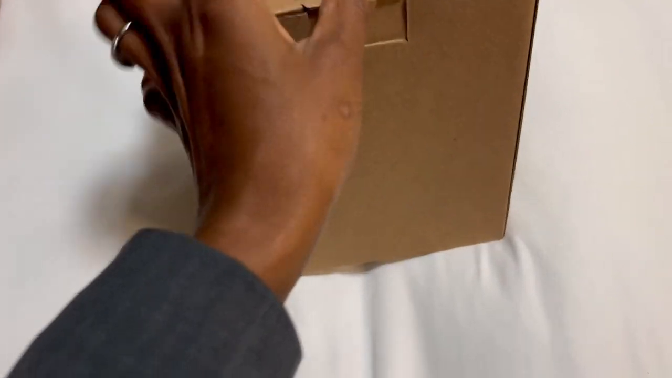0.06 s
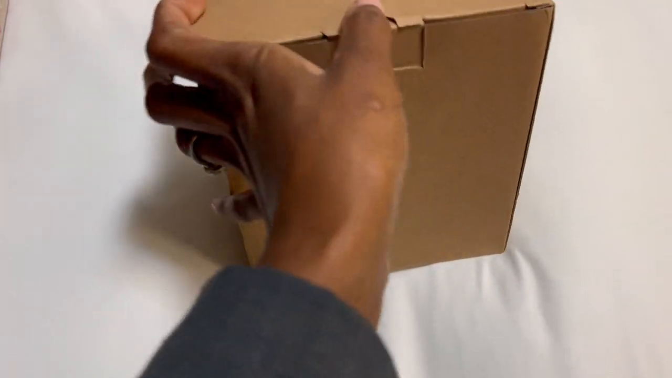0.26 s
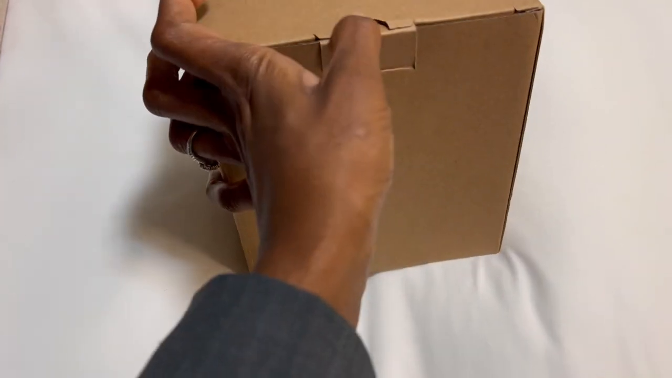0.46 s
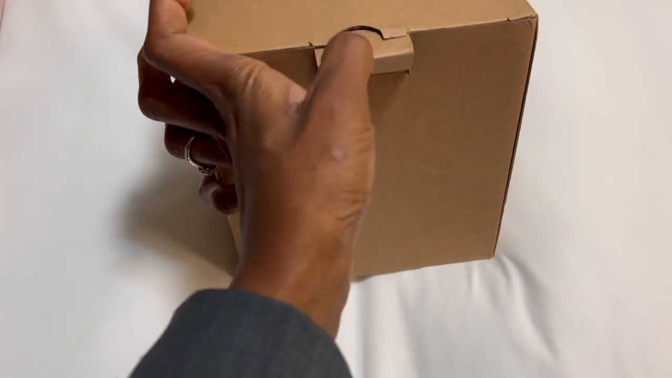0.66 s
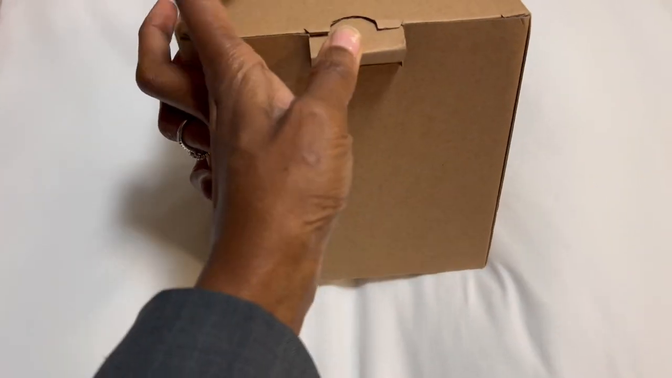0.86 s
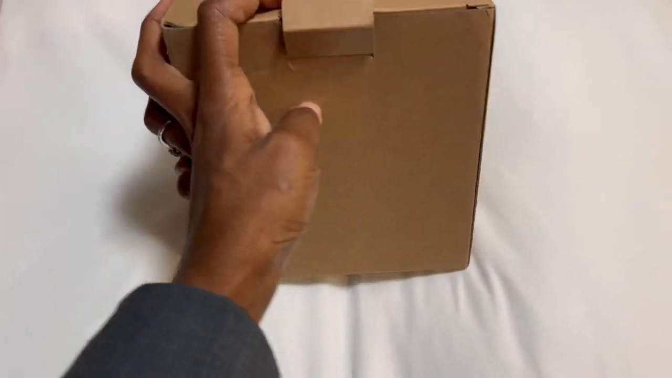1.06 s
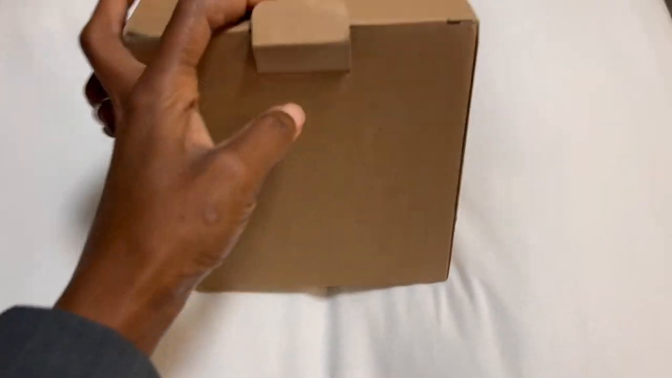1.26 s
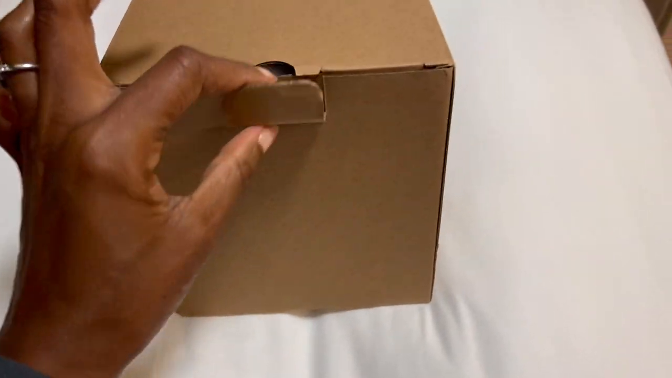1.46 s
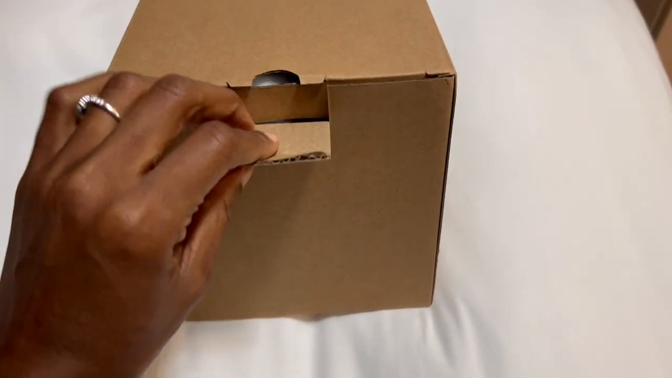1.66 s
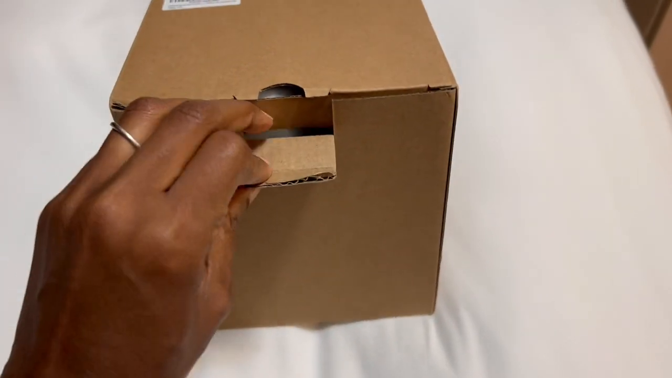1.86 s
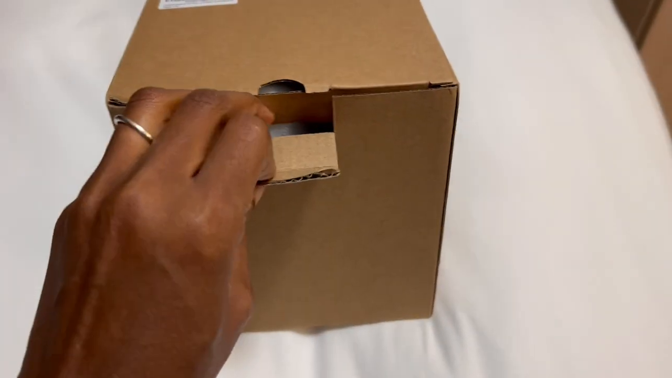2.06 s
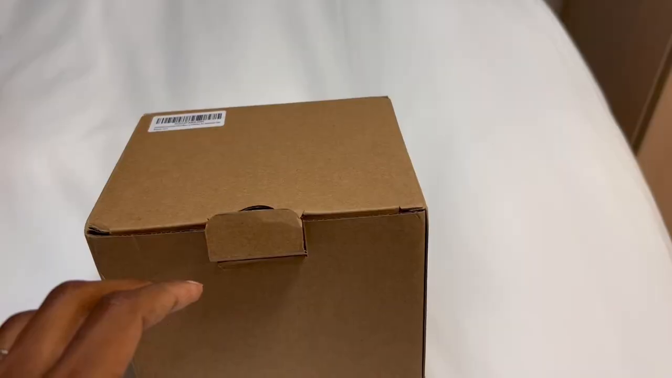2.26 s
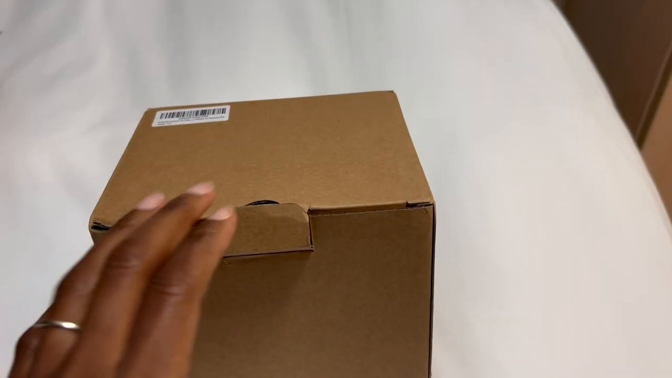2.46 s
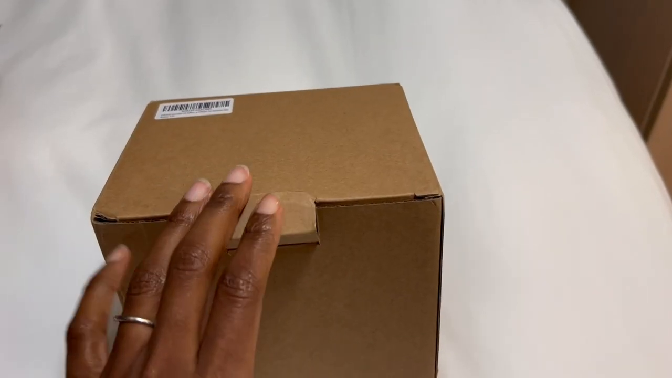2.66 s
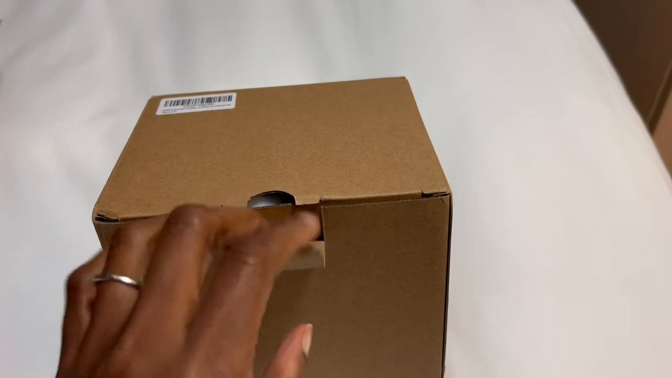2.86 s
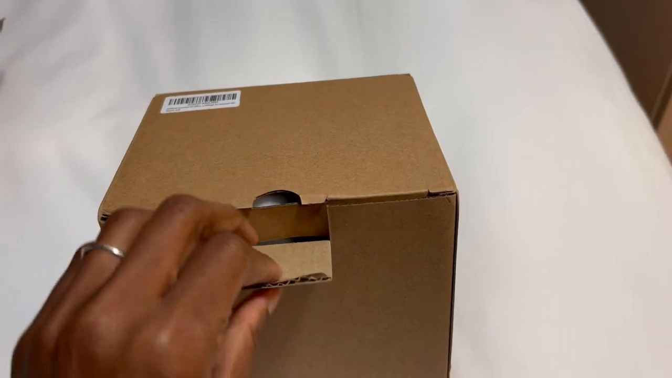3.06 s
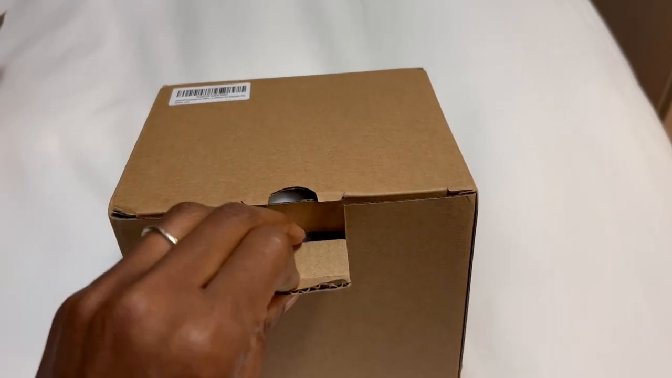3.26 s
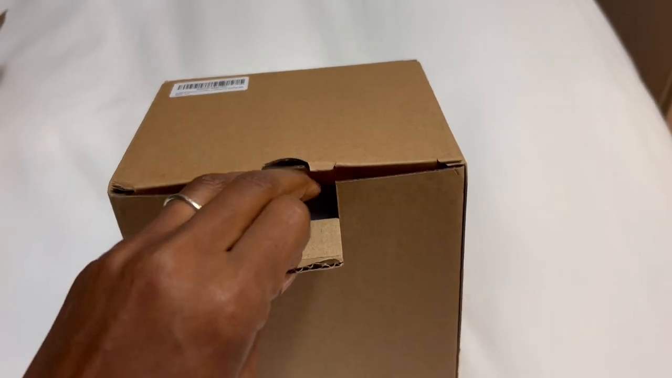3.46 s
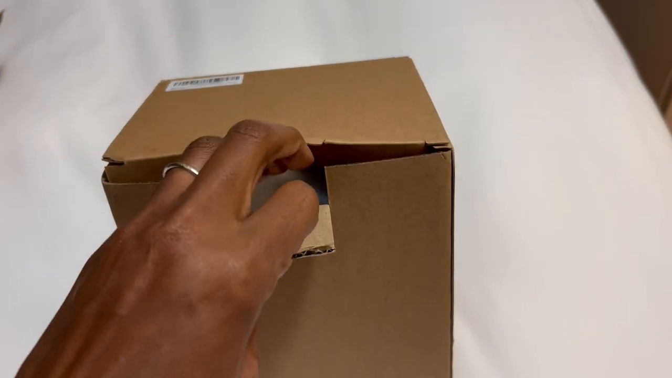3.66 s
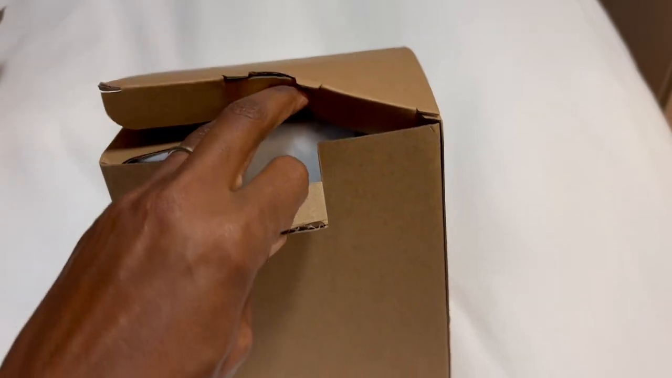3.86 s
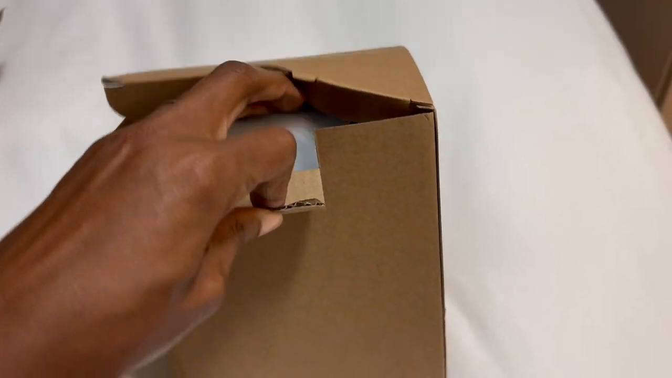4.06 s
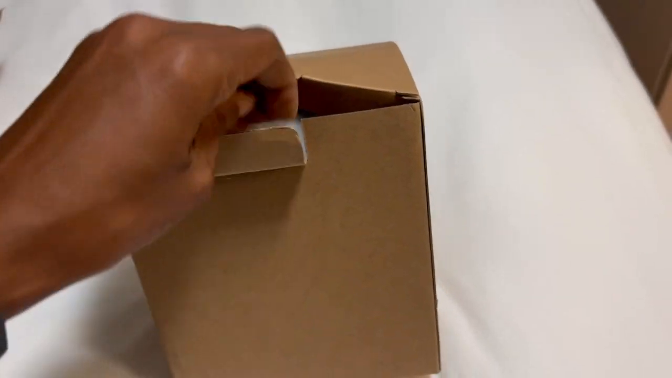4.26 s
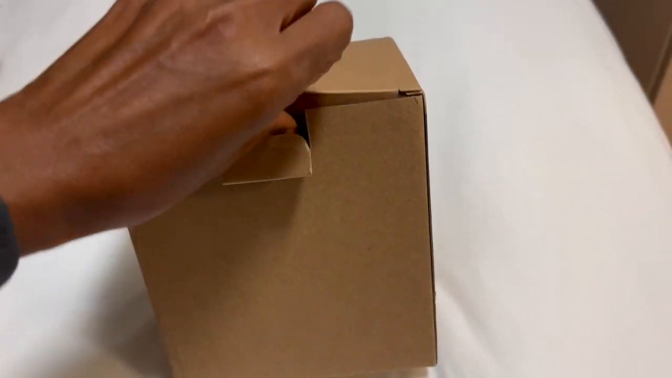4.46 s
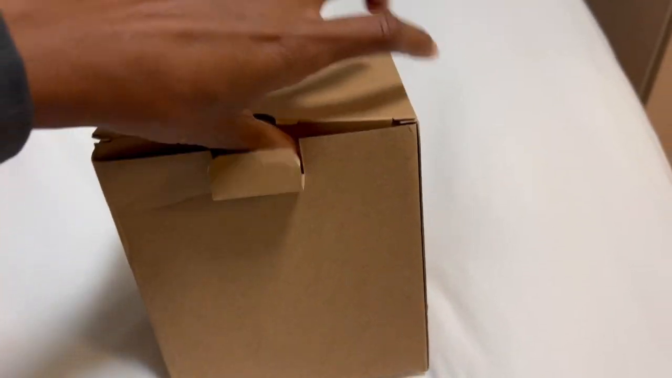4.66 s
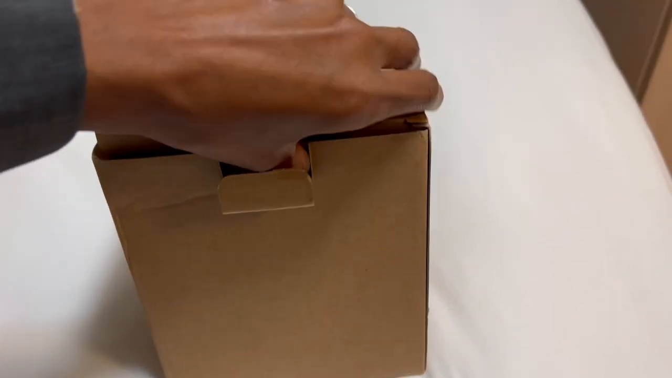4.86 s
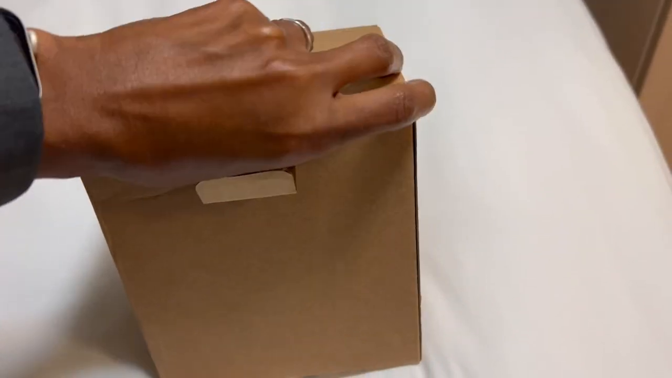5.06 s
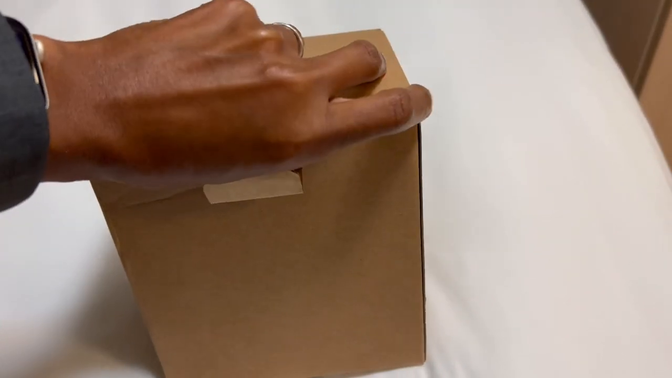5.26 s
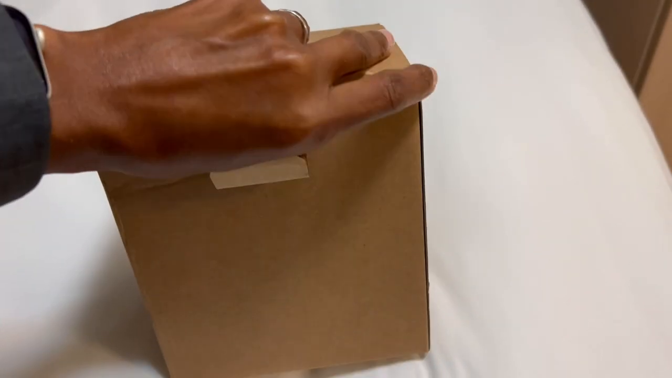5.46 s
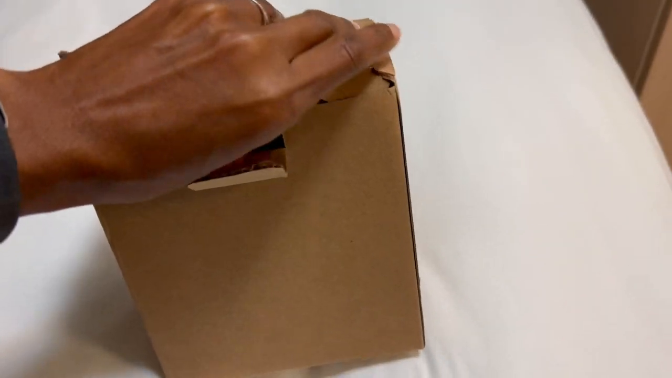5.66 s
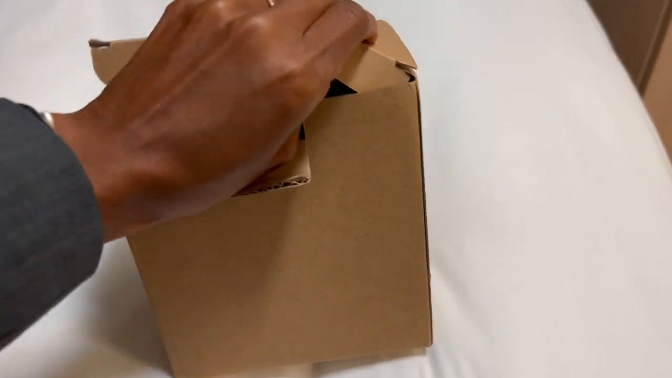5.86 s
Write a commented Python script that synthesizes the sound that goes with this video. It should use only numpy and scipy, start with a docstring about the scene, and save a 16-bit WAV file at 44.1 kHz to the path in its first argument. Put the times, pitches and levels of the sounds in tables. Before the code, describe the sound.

Thin cardboard is handled on soft bedding, heard very close in stereo, slightly left, with a short room answer. Dry rubbing and tiny ticks come first, then a strong scraping pop as a tab pulls out. The middle is subdued, with faint taps. From about 3.5 seconds the flap grates and clicks, a sharp knock sounds near 4.4 seconds, and another hard one follows a second later over continuing rustle.

```python
"""Fingertips rub and hiss over thin card, with a soft knock at once, close up in a quiet bedroom.
A hand is opening a small corrugated cardboard box on a bed: the tab scrapes out, the lid is prised up.
Rubs and scrapes are random fibre slips coloured by panel modes; ticks are short bursts on a ringing edge.
Each knock sends a bending wave through the panels, a quick falling chirp ending in a hollow thump.
Low room rumble and a short room answer surround the box, spread over two microphone ports."""
import sys
import numpy as np
from scipy import signal
from scipy.fft import rfft, irfft, next_fast_len
from scipy.io import wavfile
from scipy.ndimage import uniform_filter1d, map_coordinates

SR = 44100
rng = np.random.default_rng(int(sys.argv[2]) if len(sys.argv) > 2 else 0)


def bounce(signal):
    """Save signal as a 16-bit WAV file at the path given by the first command-line argument."""
    frames = np.transpose(np.atleast_2d(signal))
    limited = np.clip(frames, -1, 1)
    pcm = np.round(limited * 32767).astype(np.int16)
    wavfile.write(sys.argv[1], SR, pcm)


N = 261053
TIME = np.arange(N) / SR  # s
TOP_HZ = 16100  # upper band limit of the finished sound


def amp(db):
    """Decibels to gain."""
    return 10 ** (np.asarray(db) / 20)


def unit(x):
    """Scale to rms 1."""
    return x / np.sqrt(np.mean(x ** 2) + 1e-20)


def crest(x, size=441):
    """Scale so that the loudest 10 ms have rms 1."""
    loudest = uniform_filter1d(x ** 2, size).max()
    return x / np.sqrt(loudest + 1e-20)


def along(points, hz):
    """Interpolate (Hz, value) points on a log frequency axis."""
    f, v = np.transpose(points)
    return np.interp(np.log(hz + 1), np.log(f + 1), v)


def filtered(x, response):
    """Filter x by a complex response of frequency, with zero padding for its tail."""
    n = x.shape[-1]
    m = next_fast_len(n + SR // 8)
    hz = np.fft.rfftfreq(m, 1 / SR) + 1e-3  # keeps clear of 0 Hz
    return irfft(rfft(x, m) * response(hz), m)[..., :n]


def band(hz, lo_hz, hi_hz, order=6):
    """Gain of a band with soft edges."""
    return ((1 + (lo_hz / hz) ** order) * (1 + (hz / hi_hz) ** order)) ** -.5


def resonance(hz, centre, width):
    """Complex response of one damped mode, gain 1 at its centre."""
    return 1j * hz * width / (centre ** 2 - hz ** 2 + 1j * hz * width)


def add(track, s, sound):
    """Mix a sound into a track at time s, trimmed to fit."""
    start = round(s * SR)
    part = sound[max(-start, 0):len(track) - start]
    track[max(start, 0):][:len(part)] += part


def wobble(rate):
    """A smooth random curve, rate knots a second."""
    knots = rng.standard_normal(int(N * rate / SR) + 4)
    return map_coordinates(knots, [np.arange(N) * rate / SR], order=2)


def swell(start, length, top, shape):
    """A movement speeds up until the share top of its length, then slows; a larger shape is more pointed."""
    phase = np.interp((TIME - start) / length, [0, np.clip(top, .1, .9), 1], [0, .5, 1])
    moving = (phase > 0) & (phase < 1)
    speed = np.zeros(N)
    speed[moving] = np.sin(np.pi * phase[moving]) ** shape
    return speed


# Tone of the quiet room. Each row: frequency in Hz, relative level in dB.
AIR_TONE = [(20, -22), (60, 1.5), (90, -14), (140, -14), (450, -39.5), (6000, -52), (16000, -73.5)]


def air(level_db=-59):
    """Low room rumble, mostly alike at both ports, under a faint hiss that differs between them."""
    mid, side = filtered(rng.standard_normal((2, N)), lambda hz: amp(along(AIR_TONE, hz)))
    side = filtered(side, lambda hz: amp(along([(70, -8.5), (500, -1.0)], hz)))
    return amp(level_db) * unit(np.array([mid + side, mid - side]))


# How long the room rings. Each row: frequency in Hz, time to fall 60 dB in seconds.
ROOM_DECAY = [(150, 0.19), (14000, 0.26)]
# How strongly the room answers. Each row: frequency in Hz, relative level in dB.
ROOM_LEVEL = [(280, -12.5), (650, -12), (2500, -8), (12000, -12)]


def room(x):
    """Walls and bedding give a short answer: a decaying noise tail, different at each port."""
    hz, t, z = signal.stft(rng.standard_normal((2, SR // 3)), SR, nperseg=256)
    t60 = along(ROOM_DECAY, hz)[:, None]
    decay = amp(along(ROOM_LEVEL, hz)[:, None] - 60 * t / t60)
    z = z * decay * np.sqrt(2 * np.log(1000) / (t60 * SR))  # evens out the energy of long and short decays
    tail = signal.istft(z, SR, nperseg=256)[1]
    tail = np.pad(tail, ((0, 0), (SR // 300, 0)))  # the answer starts late
    return signal.fftconvolve(x[None], tail, axes=1)[:, :N]


# Phase by which the left port leads the right. Each row: frequency in Hz, phase in radians.
PORT_PHASE = [(220, .15), (1400, .7), (1800, -1.8), (2900, 1.5), (4300, -.1), (8100, .6), (10200, -3.1),
              (11600, -5.8), (12600, -6.8), (15000, -12.3)]
# Level of the left port over the right. Each row: frequency in Hz, difference in dB.
PORT_LEVEL = [(220, 0), (1000, 5.5), (4000, 5.5), (8000, 0)]


def ports(x):
    """The two ports hear the box with a level and phase difference that changes with frequency."""
    side = np.array([[.5], [-.5]])  # half of each difference per port

    def port(hz):
        return amp(side * along(PORT_LEVEL, hz)) * np.exp(1j * side * along(PORT_PHASE, hz))

    return filtered(x, port)


def width(x, side_db=-8, lo_hz=450, hi_hz=7000, size=8192):
    """The walls radiate from different places: a blend opposed at the ports, ever redrawn and crossfaded."""
    side = np.zeros(N)
    for start in range(0, N, size // 2):
        piece = x[start:start + size]
        piece = piece * np.hanning(size)[:len(piece)]
        paths = crush(np.arange(SR // 50) / SR, rise=0.00042, t60=0.0097)
        add(side, start / SR, signal.fftconvolve(piece, paths / np.linalg.norm(paths)))
    side = filtered(side, lambda hz: band(hz, lo_hz, hi_hz, order=2))
    return amp(side_db) * np.array([side, -side])


# Resonances of the card panels. Each row: frequency in Hz, width in Hz, relative level in dB.
PANEL_MODES = [(228, 53, -7), (377, 72, -8.5), (494.3, 65, 5), (568.6, 74, 4.5), (913, 100, -4),
               (1100, 160, 0.5), (1260, 410, -4), (1825, 170, 0.5), (2650, 180, -4.5), (3240, 150, -11)]


def card(hz, broad_db=-10):
    """The panels: a few modes over the broad answer of heavily damped board."""
    modes = sum(amp(db) * resonance(hz, centre, width) for centre, width, db in PANEL_MODES)
    return amp(broad_db) + modes


def slips(rate, spread_db):
    """Fibres catch and let go: random impulses, rate per second, a few much larger than the rest."""
    size = amp(spread_db * np.minimum(rng.exponential(size=N), 5))
    return (rng.random(N) < rate / SR) * size * rng.standard_normal(N)


def roaming(x, depth_db, size=9):
    """The contact point moves, so that ever different frequencies are favoured."""
    z = signal.stft(x, nperseg=512)[2]
    field = uniform_filter1d(rng.standard_normal(z.shape), size=4, axis=0)  # smooth over frequency
    for _ in range(2):  # and twice over time
        field = uniform_filter1d(field, size=size, axis=1)
    return signal.istft(z * amp(depth_db * unit(field)), nperseg=512)[1][:N]


def crush(t, rise, t60):
    """Fibres snap in a quick run that swells and dies; rise and t60 in seconds."""
    t = np.maximum(t, 0)
    return rng.standard_normal(len(t)) * (1 - np.exp(-t / rise)) * amp(-60 * t / t60)


# Colour of fibres sliding on card. Each row: frequency in Hz, relative level in dB.
FIBRE_COLOUR = [(130, 12.5), (600, -6), (1050, -2.5), (4500, -8), (8000, -5), (10000, -12.5), (12500, -7),
                (16000, -11)]


def friction(force, lo_hz, hi_hz, broad_db=-5):
    """One band of the box's answer to sliding fibres, rms 1; pressing fingers damp the modes."""
    def body(hz):
        return card(hz, broad_db=broad_db) * amp(along(FIBRE_COLOUR, hz)) * band(hz, lo_hz, hi_hz)

    return unit(filtered(force, body))


# The hand lies on the box, never quite still.
# Each row: start in seconds, end in seconds, rub drive in dB, skin hiss drive in dB.
HAND_HOLDS = [(0, 1.81, -58.5, -62), (1.79, 2.215, -58, -70.5), (2.55, 3.55, -61.5, -69),
              (3.56, 6, -59.5, -66)]
# Fingers slide to a new grip.
# Each row: start in seconds, length in seconds, rub drive in dB, skin hiss drive in dB.
GRIP_STROKES = [(0, 0.096, -50.5, -54), (0.263, 0.12, -53, -65), (0.529, 0.18, -41, -45.5),
                (1.023, 0.43, -55, -60.5), (1.381, 0.14, -51, -54.5), (1.632, 0.15, -51.5, -69),
                (1.894, 0.089, -54.5, -73.5), (2.581, 0.038, -49, -49.5), (2.688, 0.05, -55, -49),
                (2.745, 0.071, -58, -51.5), (2.895, 0.05, -64.5, -52.5), (2.927, 0.17, -49.5, -53.5),
                (4.01, 0.17, -42, -48.5), (4.171, 0.098, -47, -42.5), (4.324, 0.034, -55, -48.5),
                (4.343, 0.14, -45.5, -49), (4.678, 0.36, -50, -49.5), (5.402, 0.25, -47, -57.5),
                (5.647, 0.097, -45.5, -54), (5.838, 0.25, -48, -53)]
# The resting hand eases off briefly. Each row: start in seconds, length in seconds.
HAND_PAUSES = [(0.377, 0.12), (3.873, 0.049), (5.108, 0.041), (5.308, 0.11)]
PAUSE_DB, SETTLE_S = -4.5, 0.038  # depth of a pause; time to land or lift
STROKE_FASTEST, STROKE_SHAPE = 0.64, 0.57  # share of a stroke at which it is fastest; pointedness
STICK_PER_S, STICK_DB = 120, 2.8  # skin ridges stick and slip: knots a second, depth


def hand(shudder_db=-23.5, shudder_share=0.56, pressure_db=4.0, apart_db=-3):
    """Fingers press unevenly: panels shudder, card rasps, skin hisses. Gives shared and opposed port parts."""
    rub, hiss = np.zeros(N), np.zeros(N)
    resting = amp(PAUSE_DB * sum(swell(start, length, 0.24, 1) for start, length in HAND_PAUSES))
    moves = []
    for start, end, *levels in HAND_HOLDS:
        touch = np.clip(np.minimum(TIME - start, end - TIME) / SETTLE_S, 0, 1)
        moves.append((resting * touch, levels))
    for start, length, *levels in GRIP_STROKES:
        moves.append((swell(start, length, STROKE_FASTEST, STROKE_SHAPE), levels))
    for speed, (rub_db, hiss_db) in moves:  # the strongest movement prevails
        rub = np.maximum(rub, amp(rub_db) * speed)
        hiss = np.maximum(hiss, amp(hiss_db) * speed)
    grab = amp(pressure_db * wobble(28))

    def finger():
        """One contact, with a rasp of its own under the shared pressure."""
        force = roaming(slips(rate=5500, spread_db=1.5), depth_db=3.3)
        rasp = force * amp(STICK_DB * wobble(STICK_PER_S))
        low_rub = amp(-4.5) * rub * friction(rasp * grab, 230, 670)
        high_rub = amp(-7) * rub * friction(rasp * grab, 1000, 3300)
        skin = amp(-3.5) * hiss * friction(force + rasp, 3600, 26000)
        return low_rub + high_rub + skin

    # the shudder grows more slowly than the rub
    shudder = amp(shudder_db) * rub ** shudder_share * friction(rng.standard_normal(N) * grab, 31, 260)
    return shudder + finger(), amp(apart_db) * np.array([[1], [-1]]) * finger()


# Skin glides flat over the smooth card.
# Each row: start in seconds, length in seconds, level in dB, pitch in Hz.
GLIDES = [(1.016, 0.36, -48, 4894)]
# The narrow bands of its hiss. Each row: frequency as a multiple of the pitch, relative level in dB.
GLIDE_BANDS = [(1, -1.5), (1.22, -8)]
SWISH_FASTEST, SWISH_SHAPE = 0.2, 0.78  # share at which it is fastest; pointedness


def swish(width_hz=650, right_db=-12):
    """The hand glides over the smooth face: noise in two narrow bands, mostly on the left."""
    out = np.zeros(N)
    for start, length, db, pitch in GLIDES:
        def tones(hz):
            return sum(amp(band_db) * resonance(hz, ratio * pitch, width_hz) ** 2
                       for ratio, band_db in GLIDE_BANDS)

        hiss = unit(filtered(rng.standard_normal(N), tones))
        out += amp(db) * swell(start, length, SWISH_FASTEST, SWISH_SHAPE) * hiss
    return np.array([out, amp(right_db) * out])


# Card dragged tightly over card.
# Each row: start in seconds, length in seconds, level in dB, ring of the dragging edge in Hz.
DRAGS = [(0.517, 0.075, -44.5, 1310), (0.595, 0.11, -45.5, 1370), (0.951, 0.037, -28, 2100),
         (0.996, 0.048, -25, 1200), (1.086, 0.037, -38, 1250), (1.707, 0.061, -48, 1205),
         (2.947, 0.032, -46.5, 2340), (2.953, 0.1, -49.5, 3420), (3.557, 0.11, -35, 1780),
         (3.737, 0.075, -31, 1580), (4.103, 0.042, -36, 3520), (4.176, 0.051, -49, 1765),
         (4.82, 0.022, -44, 1877), (5.268, 0.016, -42.5, 1842)]
SCRAPE_TIGHTEST, SCRAPE_SHAPE = 0.51, 1.8  # share at which it binds most; pointedness
SCRAPE_HISS_DB = -7.5  # hiss over rasp


def scrapes(edge_db=-7.0, edge_width_hz=600):
    """The tab and flaps bind harder, then slide free; catching fibres buzz the edge that drags."""
    out = np.zeros(N)
    force = roaming(slips(rate=3200, spread_db=1), depth_db=2.5) * amp(2.2 * wobble(260))
    rasp = friction(force, 230, 3600, broad_db=-2.0)
    rasp = rasp + amp(SCRAPE_HISS_DB) * friction(force, 3500, TOP_HZ * 2)
    for start, length, db, edge_hz in DRAGS:
        grip = swell(start, length, SCRAPE_TIGHTEST, SCRAPE_SHAPE)
        on = grip > 0
        buzz = filtered(force[on], lambda hz: resonance(hz, edge_hz, edge_width_hz) ** 2)
        drag = unit(unit(rasp[on]) + amp(edge_db) * unit(buzz))
        out[on] += amp(db) * grip[on] * drag
    return out


# Nails and cut edges flick past each other. Each row: start in seconds, peak level in dB, ring in Hz.
FLICKS = [(0.184, -40, 2670), (0.353, -24, 11250), (0.541, -22.5, 8650), (0.5503, -24.5, 11600),
          (0.5942, -25, 4260), (0.6461, -24.5, 11500), (0.9652, -23, 7460), (0.974, -24, 11400),
          (1.008, -10.5, 8000), (1.0213, -11.5, 12100), (1.3699, -30, 4000), (1.376, -33.5, 4030),
          (1.51, -20, 7200), (1.924, -62.5, 1400), (2.5927, -35, 5430), (3.7096, -39, 1162),
          (3.766, -23.5, 8000), (4.345, -31.5, 8000), (4.398, -23, 7900), (4.717, -31.5, 6100)]


def ticks(ring_width_hz=1300, broad_db=-10):
    """A tiny burst of snapping fibres rings the stiff edge of the card."""
    out, t = np.zeros(N), np.arange(SR // 16) / SR
    for s, db, ring_hz in FLICKS:
        def edge(hz):
            return resonance(hz, ring_hz, ring_width_hz) + amp(broad_db) * band(hz, 970, 17000)

        tick = filtered(crush(t, rise=0.00051, t60=0.0093), edge)
        add(out, s, amp(db) * tick / np.abs(tick).max())
    return out


ECHO_DB, ECHO_PATH = -11.5, 2.4  # the wave returns once from the far edge; its path over the direct one


def bending(hz, travel):
    """Bending waves speed up as the root of frequency: a push arrives as a falling chirp, then echoes once."""
    turn = -4j * np.pi * travel * np.sqrt(hz * 10 ** 3)
    return np.exp(turn) + amp(ECHO_DB) * np.exp(ECHO_PATH * turn)


# The card gives way or is knocked. Each row: time in seconds, strength in dB,
# hardness as knock over thump in dB, wall pitch in Hz, fizz of fibres in dB,
# travel time of the wave at 1 kHz in seconds, ring of the struck spot in Hz.
GIVES = [(0.033, -37, 8, 175, -43.5, 0.0032, 1308), (0.2447, -43.5, -0.5, 272, -81, 0.0044, 540),
         (0.257, -46, 9, 287, -64, 0.0052, 507), (0.972, -20, 3.5, 161, -22.5, .0065, 2100),
         (1.0225, -14.5, -6, 213, -31.5, .0036, 1260), (1.448, -44.5, 8.5, 150, -50, 0.0041, 1910),
         (1.504, -35, 4.5, 164, -65, 0.0055, 1150), (1.648, -49, -9, 170, -60, .0055, 605),
         (2.603, -49.5, -9.5, 163, -65, 0.0042, 2710), (3.064, -54.5, -14, 166, -62, 0.0059, 1200),
         (3.782, -33.5, -3.5, 313, -34.5, 0.0061, 1440), (3.837, -43.5, 0.5, 209, -65, 0.0032, 1100),
         (4.1064, -29, -5, 178, -32, 0.0057, 1240), (4.209, -32, 0, 150, -35.5, .0045, 1293),
         (4.347, -57, -19, 147, -49, .004, 1200), (4.4427, -20.5, 4, 150, -44, 0.0029, 2720),
         (4.658, -34.5, 5.5, 163, -34.5, .0035, 2620), (5.029, -45.5, 7.5, 275, -52.5, 0.0029, 1817),
         (5.5521, -15.5, 9, 382, -35, 0.0034, 1062)]
CRACK_DB, CRACK_GROWS = -10, 0.13  # crack over knock; dB per dB of hardness
RING_DB, RING_GROWS = -9.5, 0.26  # ring over knock; dB per dB of hardness
RING_WIDTH_HZ = 83  # for a ring at 1 kHz; grows as the square of its pitch


def knocks(scatter_db=-32, thump_t60=0.046, thump_rise=0.0013, thump_lead=.003, snap_db=13,
           strain_db=-11, strain_s=0.027, tail_db=-13, tail_t60=0.11):
    """A sudden push spreads as a bending wave, scatters from the folds and swings the whole wall."""
    out = np.zeros(N)
    t = (np.arange(SR // 4) - SR // 64) / SR  # starts before the push at 0
    u = np.maximum(t + thump_lead, 0)  # the wall starts to swing a little early
    for s, knock_db, hardness_db, thump_hz, fizz_db, travel, ring_hz in GIVES:
        # the harder the spot, the less it thumps and the more it cracks and rings
        thump_db = knock_db - hardness_db
        crack_db = knock_db + CRACK_DB + CRACK_GROWS * hardness_db
        ring_db = knock_db + RING_DB + RING_GROWS * hardness_db

        def arrive(force, body):
            return crest(filtered(force, lambda hz: body(hz) * bending(hz, travel)))

        def part(force, lo_hz, hi_hz):
            return arrive(force, lambda hz: card(hz) * band(hz, lo_hz, hi_hz))

        def spot(hz):
            ring_width = RING_WIDTH_HZ * (ring_hz / 1000) ** 2
            return resonance(hz, ring_hz, ring_width) * band(hz, ring_hz / 2, 2 * ring_hz)

        push = (t == 0) + amp(scatter_db) * crush(t, rise=0.0012, t60=0.064)
        # fibres start to crack just before the fold gives, and go on snapping unevenly after it
        strain = amp(strain_db) * crush(-t, rise=1 / SR, t60=strain_s)
        crackle = strain + crush(t, rise=0.0024, t60=0.034)
        settling = amp(tail_db) * crush(t, rise=strain_s / 2, t60=tail_t60)
        settling = settling * rng.exponential(size=len(t))
        # the wall's pitch depends on where the hand grips it
        wall = np.sin(2 * np.pi * thump_hz * u) * amp(-60 * u / thump_t60) * (1 - np.exp(-u / thump_rise))
        thump = arrive(wall, lambda hz: band(hz, thump_hz / 2, 600)) + amp(-7.5) * part(push, 70, 150)
        ring = arrive(push, spot)
        # a stiff corner favours the higher modes; the soft middle of a wall does the opposite
        tap = filtered(push, lambda hz: np.clip(hz / 750, .5, 2) ** (hardness_db / 20))
        # one clean snap in a run of crackle, weaker where the spot rings below 1 kHz
        crack = part(amp(snap_db) * (t == 0) + crackle + settling, 780, 4100)
        crack = crack * min(ring_hz / 1000, 1) ** 2
        knock = amp(thump_db) * thump + amp(knock_db - 4) * part(tap, 200, 940)
        knock = knock + amp(ring_db) * ring + amp(crack_db) * crack
        fizz = amp(fizz_db) * part(crackle, 8600, 19000)
        add(out, s + t[0], knock + fizz)
    return out


def scene():
    """All the sounds of the box, direct and through the room."""
    rubbing, apart = hand()
    box = rubbing + scrapes() + knocks() + ticks()
    return ports(box) + width(box) + room(box) + apart + swish() + air()


def record(dry):
    """The phone rounds off the highest peaks and keeps nothing above its band limit."""
    rounded = dry / (1 + np.abs(dry / .76) ** 5) ** (1 / 5)
    return filtered(rounded, lambda hz: np.clip((TOP_HZ - hz) / 400 + .5, 0, 1))


dry = scene()
out = record(dry)
bounce(out)
```